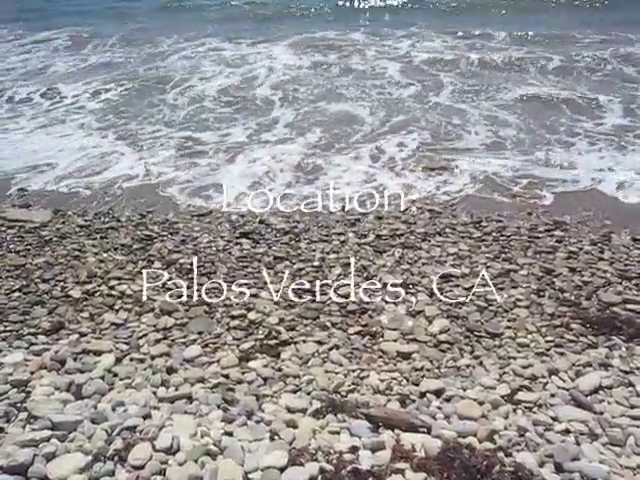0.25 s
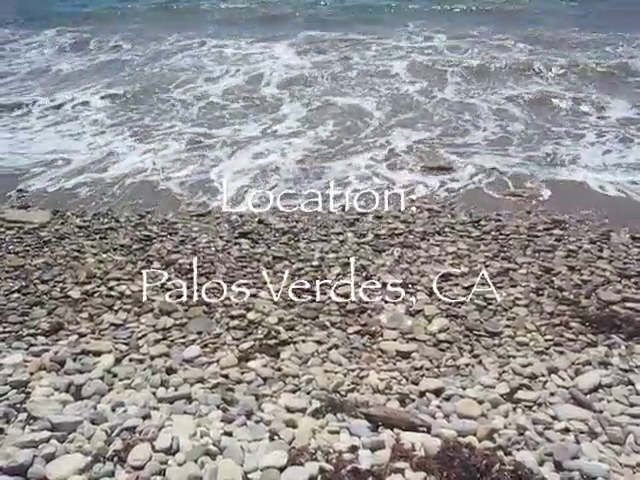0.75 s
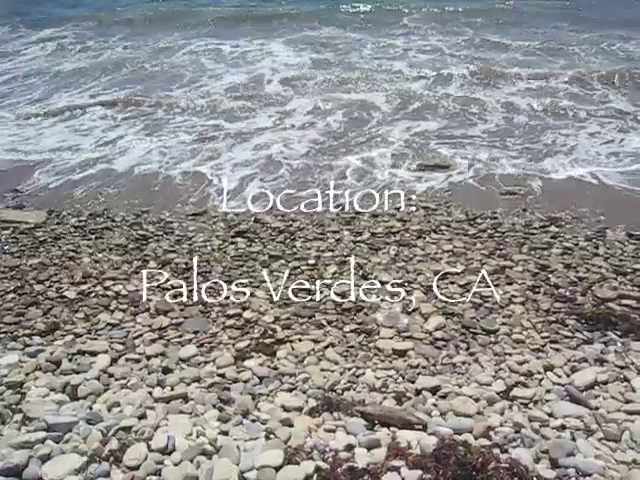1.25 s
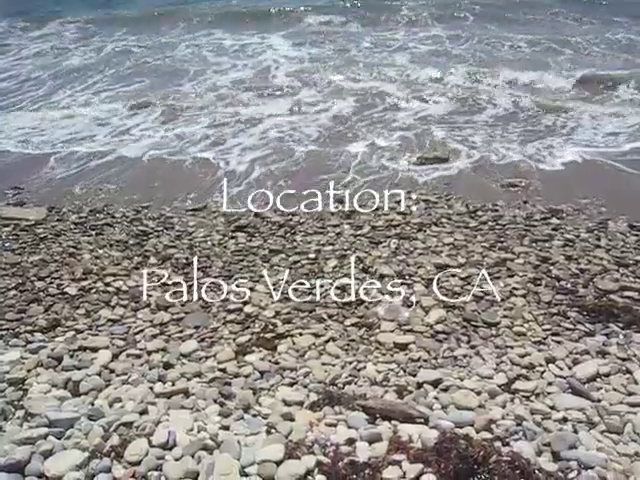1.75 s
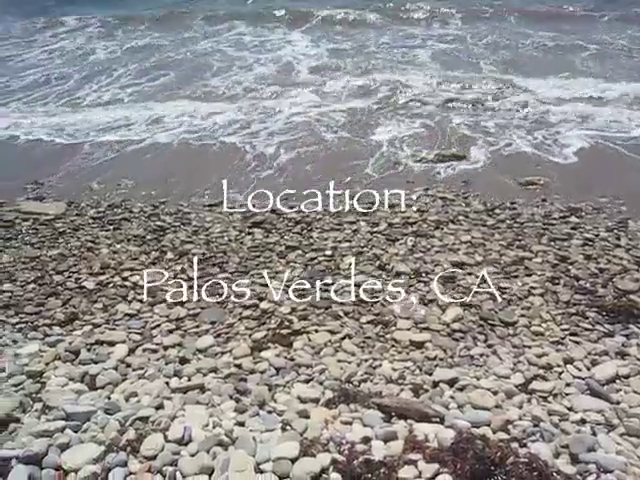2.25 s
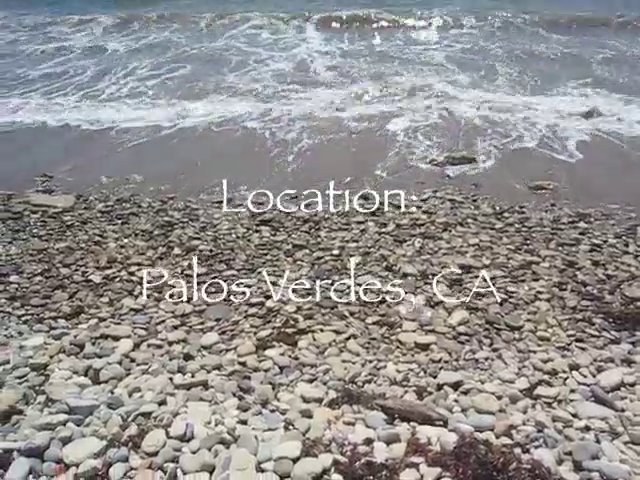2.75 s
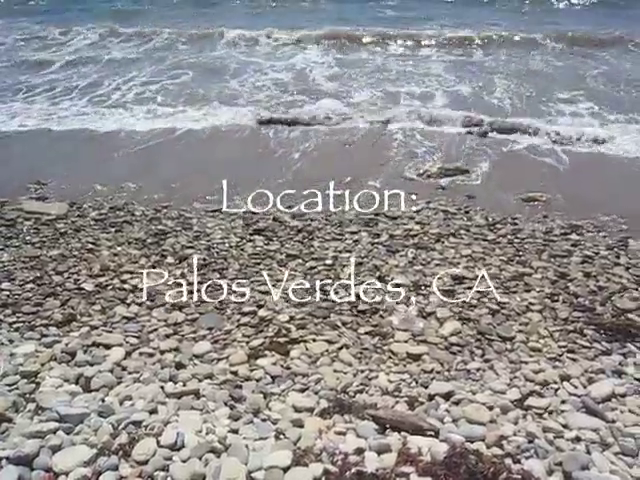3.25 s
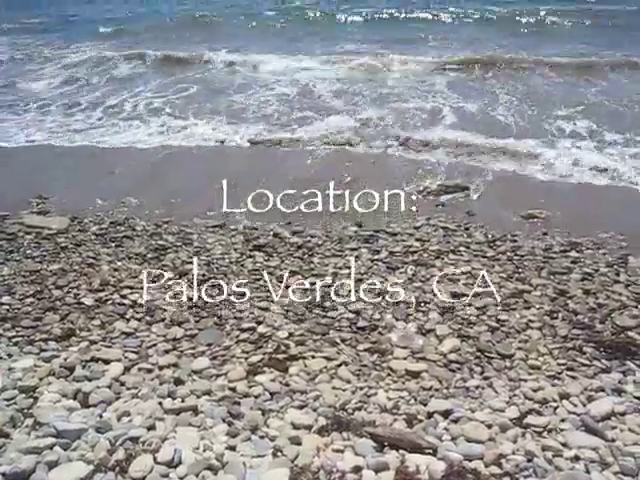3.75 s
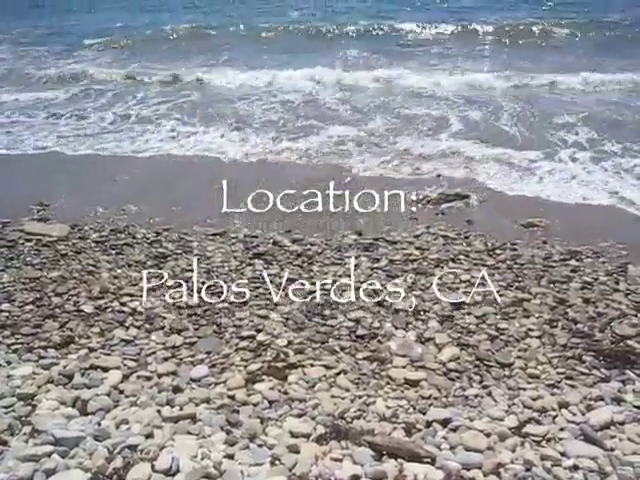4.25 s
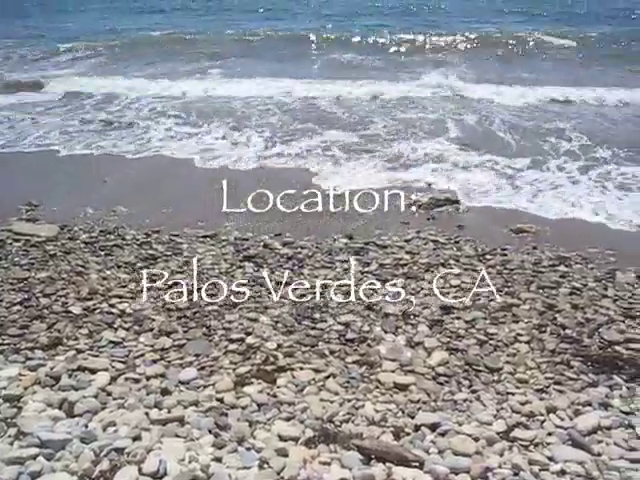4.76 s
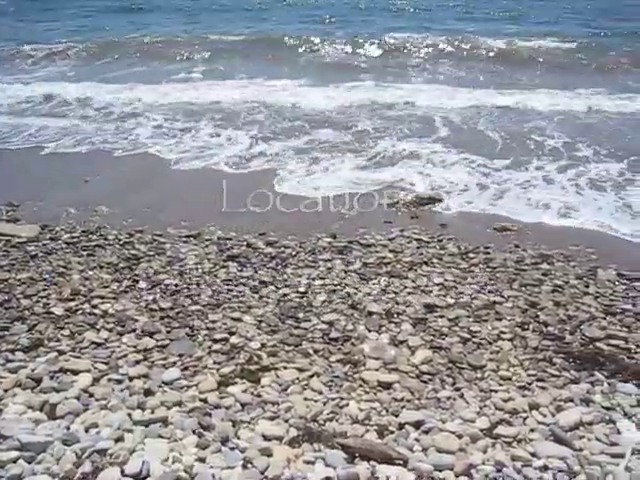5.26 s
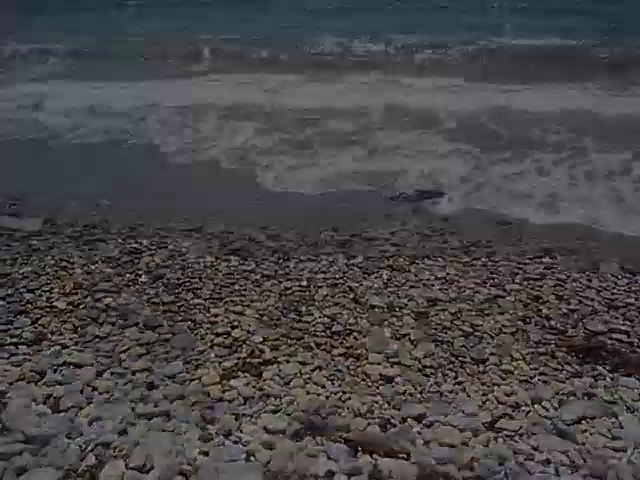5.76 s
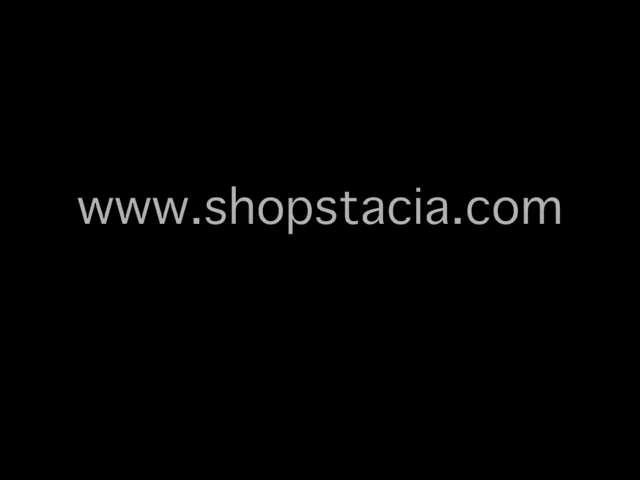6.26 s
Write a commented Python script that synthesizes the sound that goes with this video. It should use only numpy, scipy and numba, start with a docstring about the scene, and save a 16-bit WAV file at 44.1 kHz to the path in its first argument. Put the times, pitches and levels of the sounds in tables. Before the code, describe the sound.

Pebbles knock and rattle beside a dull sea before a wave rushes in, bubbling and fizzing, with low wind thumps and an abrupt fade.

```python
"""Stones knock close to the microphone, over the hiss of backwash on a pebble beach and a far, dull sea.
Then a wave breaks and foams in: large and small bubbles ring, drops splash and foam fizzes over noise.
The surf arrives directly and again off the beach; wind buffets the microphone, in gusts over a breeze.
Stones ring in decaying modes with a rasp of grit. Gain control ducks just after peaks such as the
hardest knock; the treble is cut off at the top, and the sound fades and is cut at the end."""
import sys
import numpy as np
from scipy import signal
from scipy.fft import rfft, irfft, next_fast_len
from scipy.io import wavfile
from scipy.ndimage import map_coordinates
from numba import njit

SR = 44100
rng = np.random.default_rng(int(sys.argv[2]) if len(sys.argv) > 2 else 0)


def file_out(sig):
    """Save sig as 16-bit WAV at sys.argv[1]."""
    # one column per channel
    cols = np.atleast_2d(sig).T
    # limit, then scale
    lim = np.clip(cols, -1, 1)
    pcm = np.round(lim * 32767).astype(np.int16)
    wavfile.write(sys.argv[1], SR, pcm)


N = 286205
TIME = np.arange(N) / SR
FADE_START_S, FADE_END_S = 5.61, 5.954
STOP_S = 5.893  # silence from here, just before the fade would reach zero


def undb(db):
    """Decibels to gain."""
    return 10 ** (np.asarray(db) / 20)


def unit(x):
    """Scale to rms 1."""
    return x / np.sqrt(np.mean(x ** 2))


def curve(table):
    """The second column of a table, joined by straight lines in time."""
    s, values = np.transpose(table)
    return np.interp(TIME, s, values)


def colour(x, spectrum):
    """Filter by (f/Hz, level/dB) points, joined by straight lines over log frequency; rms 1."""
    size = next_fast_len(N)
    hz, db = np.transpose(spectrum)
    bins = np.maximum(np.arange(size // 2 + 1) * SR / size, 1)
    gain = undb(np.interp(np.log(bins), np.log(hz), db))
    return unit(irfft(rfft(x, size) * gain, size)[:N])


def walk(rate):
    """Slow chance: random levels, `rate` per second, smoothly joined; spread near 1."""
    levels = rng.standard_normal(4096)
    return map_coordinates(levels, [TIME * rate], order=3, mode="wrap")


def swell(start_s, rise_s):
    """A smooth rise from 0 to 1."""
    return .5 - .5 * np.cos(np.pi * np.clip((TIME - start_s) / rise_s, 0, 1))


def add(out, s, sound):
    """Mix a sound in at time s."""
    i = max(int(s * SR), 0)
    out[i:i + len(sound)] += sound[:N - i]


# modes of a struck stone: f [multiple of its ring frequency], level/dB
STONE_MODES = [(.41, 1), (.64, -4), (1, 0), (1.13, -7), (1.66, -3)]


def knock(hz, t60, rattle_s, bounce=0.84, scrape_db=-4.0, count=4):
    """One stone strikes another, chatters and scrapes against it; every contact rings the same modes."""
    t = TIME[:SR // 16]
    contacts = rattle_s * (np.arange(count) + rng.uniform(-0.26, 0.28, count)) / count
    contacts[0] = 0
    age = np.maximum(t - contacts[:, None], 0)
    modes = sum(undb(db) * np.sin(2 * np.pi * hz * ratio * age) for ratio, db in STONE_MODES)
    ring = modes * np.exp(-np.log(1000) * age / t60)
    force = np.where(contacts > 0, bounce, 1)
    # grit between the stones rasps for about as long as they rattle
    grit = rng.standard_normal(len(t)) * np.exp(-(t / rattle_s) ** 2)
    # a stone radiates little below its lowest mode or above its highest
    body = signal.butter(3, [.33 * hz, 1.75 * hz], "band", fs=SR, output="sos")
    struck = unit(signal.sosfilt(body, force @ ring))
    scrape = undb(scrape_db) * unit(signal.sosfilt(body, grit))
    sound = struck + scrape
    return sound * np.sqrt(.006 * SR / np.sum(sound ** 2))  # the energy of 6 ms at rms 1


# stones knocked together by the water near the microphone:
# t/s, level over 6 ms/dB, ring f/Hz, ring time to -60 dB t60/s, rattle length/s
STONE_KNOCKS = [ (0.013, -23.5, 1870, .010, 0.0034), (0.054, -25, 1780, 0.011, 0.0058),
                (0.132, -22, 1400, 0.011, .008), (0.1825, -15.5, 1980, 0.0053, 0.0082),
                (0.449, -22, 1810, 0.025, 0.0028), (0.616, -20, 800, 0.017, 0.0047),
                (0.662, -21, 1650, 0.021, 0.0048), (0.821, -20, 2100, .012, 0.00402),
                (1.2746, -18.5, 2700, 0.0052, 0.00242), (1.3702, -15.5, 830, 0.0099, 0.0026),
                (1.424, -21, 1950, 0.011, 0.00353), (2.883, -18.5, 2600, 0.0066, 0.0038),
                (2.8945, -17.5, 1900, 0.0088, 0.0026), (2.911, -10.5, 2800, 0.0093, 0.0035),
                (3.039, -22, 2470, .008, 0.0034), (4.129, -18, 2000, 0.012, 0.0093)]


def stones(faintest_db=-45, range_db=6, low_hz=1100, octaves=0.91, count=45):
    """A few hard knocks, and pebbles rolling faintly under the water all the while."""
    out = np.zeros(N)
    for s, db, hz, t60, rattle_s in STONE_KNOCKS:
        add(out, s, undb(db) * knock(hz, t60, rattle_s))
    for when, loud, pitch in rng.random((count, 3)):
        pebble = knock(low_hz * 2 ** (octaves * pitch), t60=0.016, rattle_s=0.0075)
        add(out, when * STOP_S, undb(faintest_db + range_db * loud) * pebble)
    return out


# colour of the distant breakers: f/Hz, relative level per Hz/dB
FAR_SEA_COLOUR = [(15, -48.5), (70, -13), (170, 0), (280, 2.5), (400, -0.5), (600, 3.5), (800, -5),
                  (1150, 2), (1500, -7.5), (3000, -29.5), (12000, -43)]


def far_sea(db=-30.5, swell_db=1.5):
    """Distant breakers all along the shore blend into a dull roar of noise, its level wavering slightly."""
    return colour(rng.standard_normal(N), FAR_SEA_COLOUR) * undb(db + swell_db * walk(13))


@njit
def ring_grains(start, hz, cycles, size, glide):
    """Add up decaying sines whose pitch rises by the fraction `glide` as they die away."""
    out = np.zeros(N)
    for k in range(len(start)):
        length = int(cycles[k] * SR / hz[k]) + 2
        turn = 2 * np.pi * hz[k] / SR
        pole = np.exp(1j * turn - 5.75 / length)  # falls 50 dB over the length
        bend = np.exp(1j * turn * glide / length)
        z = size[k] + 0j
        for i in range(start[k], min(start[k] + length, N)):
            out[i] += z.imag
            z *= pole
            pole *= bend
    return out


def bubbles(low_hz, high_hz, cycles, spread_db, glide, count, blur_db):
    """A cloud of ringing bubbles, many faint and a few loud, over the noise blur of countless more."""
    when, pitch, damping, loud, sign = rng.random((count, 5)).T
    hz = low_hz * (high_hz / low_hz) ** pitch
    # small bubbles die sooner, so they start stronger: even energy per Hz
    size = undb(-spread_db * np.log(loud + 1 / 300)) * hz * np.sign(sign - .5)
    start = (when * N).astype(np.int64)
    cloud = unit(ring_grains(start, hz, cycles * (.5 + damping), size, float(glide)))
    return cloud + undb(blur_db) * rng.standard_normal(N)


# churning level: quiet in the backwash, swelling as the wave breaks, held while it runs in
BACKWASH_DB, WAVE_DB = -32, -23
BREAK_S, BREAK_RISE_S = 0.68, 0.97
# splash and fizz relative to the churning; finely broken water makes more of both (dB per dB)
SPLASH_DB, SPLASH_PER_FINENESS = -0.35, 0.15
FIZZ_DB, FIZZ_PER_FINENESS = -8, 0.5
SPRAY_LAG_S = 0.12  # splash and fizz swell a little after the churning
BACKWASH_FIZZ_DB = 2  # extra fizz of the foam left by the last wave
# how finely the water is broken up: t/s, small over large bubbles, level/dB
WATER_FINENESS = [(0, 0.56), (1.3, 0.8), (2.2, -1.3), (3.0, 1.53), (3.85, 3), (5.05, -0.73), (5.6, 0.2)]
# colours of the four surf layers, each: f/Hz, relative level per Hz/dB
LARGE_COLOUR = [(20, -62.5), (70, -28.5), (130, -11.5), (180, -1.5), (250, -12), (330, -10), (450, -6),
                (630, 1), (800, 1), (1100, -10), (3000, -39)]
SMALL_COLOUR = [(300, -46), (700, -3), (900, -3.5), (1120, 1.5), (1400, -3.5), (1800, -15), (2600, -11.5),
                (6000, -45.5)]
SPLASH_COLOUR = [(600, -28.5), (1300, 1), (2000, 0.5), (2700, -1), (3600, -5), (5000, -10), (6500, -18),
                 (15000, -49)]
FIZZ_COLOUR = [(1500, -14.5), (3200, 0), (4800, 4), (6500, 3), (7800, -0.5), (10000, -1.5), (11700, -1),
               (13500, -5.5), (15700, -9)]


def surf():
    """Large and small bubbles churn, drops splash and foam fizzes as the wave breaks and runs in."""
    broken = swell(BREAK_S, BREAK_RISE_S)
    late_broken = swell(BREAK_S + SPRAY_LAG_S, BREAK_RISE_S)
    churn_db = BACKWASH_DB + (WAVE_DB - BACKWASH_DB) * broken
    spray_db = (WAVE_DB - BACKWASH_DB) * (late_broken - broken)
    fineness_db = curve(WATER_FINENESS)
    splash_db = SPLASH_DB + SPLASH_PER_FINENESS * fineness_db + spray_db
    left_foam_db = BACKWASH_FIZZ_DB * (1 - broken)
    fizz_db = FIZZ_DB + FIZZ_PER_FINENESS * fineness_db + left_foam_db + spray_db
    surge_db = 0.22 * walk(4.2) + 0.5 * walk(50)  # the front tumbles unevenly, in all sizes at once

    large = bubbles(165.6, 1240, cycles=10.5, spread_db=0.5, glide=0.11, count=7000, blur_db=3.5)
    small = bubbles(599, 2375, cycles=14.3, spread_db=1.5, glide=0.18, count=7000, blur_db=6.5)
    splash = bubbles(890, 8000, cycles=7, spread_db=2.0, glide=0.15, count=26000, blur_db=6.5)
    fizz = bubbles(3500, 16000, cycles=2.9, spread_db=2.5, glide=.1, count=50000, blur_db=3.5)

    # the churning shifts between the two sizes at constant power
    small_share = 1 / (1 + undb(-2.2 * fineness_db + 2.0))
    # the finer the water is broken up, the higher the small bubbles ring
    pitch = 2 ** (.06 * (fineness_db - 2.5))
    small = colour(small, SMALL_COLOUR)
    small = np.interp(np.cumsum(pitch), np.arange(N), small, period=N)
    small = small * np.sqrt(small_share) * undb(.5 + 0.31 * walk(32))
    large = colour(large, LARGE_COLOUR) * np.sqrt(1 - small_share) * undb(0.35 + 0.91 * walk(35))
    splash = colour(splash, SPLASH_COLOUR) * undb(splash_db + 0.64 * walk(30))
    fizz = colour(fizz, FIZZ_COLOUR) * undb(fizz_db + .25 * walk(39))
    return (large + small + splash + fizz) * undb(churn_db + surge_db)


ECHO_START, ECHO_FULL, ECHO_FULL_S = 0.049, 0.22, 2.3  # strengths 0-1, and when it is full
# how much later the surf reaches the microphone off the beach: t/s, lag/ms
BEACH_ECHO_LAG = [(1.4, 2.02), (2.3, 1.98), (3.2, 1.79), (4.2, 1.99), (5.2, 1.91)]


def off_the_beach(x, dull_hz=3800):
    """The surf arrives twice, which hollows its sound; rough stones scatter the treble of the echo."""
    lag_ms = curve(BEACH_ECHO_LAG)
    strength = np.interp(TIME, [0, ECHO_FULL_S], [ECHO_START, ECHO_FULL])
    smooth = signal.sosfiltfilt(signal.butter(1, dull_hz, fs=SR, output="sos"), x)
    echo = np.interp(TIME - lag_ms / 1000, TIME, smooth)
    return (x + strength * echo) / np.sqrt(1 + strength ** 2)


BREEZE_DB, FLURRY_DB, FLURRIES_PER_S = -43, 2, 26
# gusts on the microphone: peak t/s, buffeting level/dB, length/s
WIND_GUSTS = [(0.56, -37, 0.16), (0.82, -32, 0.16), (1.57, -32, 0.26), (2.101, -26, 0.23),
              (2.431, -26.5, 0.26), (2.68, -24, 0.16), (2.98, -33, 0.12), (4.05, -45.5, 0.3),
              (4.93, -37, 0.25), (5.49, -30.5, 0.12)]
# colour of the buffeting: f/Hz, relative level per Hz/dB
BUFFET_COLOUR = [(8, -64.5), (22, -30.5), (35, -13), (55, -8.5), (110, -1.5), (170, -5.5), (260, -6.5),
                 (400, -16.5), (900, -49)]


def wind():
    """Eddies thump on the microphone in flurries; gusts swell, die and add their power to the breeze."""
    power = undb(BREEZE_DB) ** 2
    for s, db, length_s in WIND_GUSTS:
        power = power + undb(db) ** 2 * np.exp(-(2 * (TIME - s) / length_s) ** 2)
    buffeting = colour(rng.standard_normal(N), BUFFET_COLOUR)
    return buffeting * np.sqrt(power) * undb(FLURRY_DB * walk(FLURRIES_PER_S))


def scene():
    """Everything at one microphone, the same in both ears."""
    sound = stones() + far_sea() + off_the_beach(surf()) + wind()
    return np.array([sound, sound])


@njit
def follow(x, attack_s, release_s):
    """Level detector that rises fast and falls slowly."""
    out, e = np.empty(len(x)), 0.
    for i in range(len(x)):
        e += (x[i] - e) / (SR * (attack_s if x[i] > e else release_s))
        out[i] = e
    return out


TOP_HZ = 15800  # little treble passes above this


def record(dry, threshold_db=-10, attack_s=0.0003, release_s=0.11, ceiling=1.0):
    """Gain control ducks just after loud peaks, the hardest are rounded off; the end is faded and cut."""
    level = follow(np.abs(dry[0]), attack_s, release_s)
    late = np.interp(TIME - .0016, TIME, level)  # the gain reacts 1.6 ms late
    held = dry / np.maximum(late / undb(threshold_db), 1)
    rounded = held / (1 + (held / ceiling) ** 4) ** (1 / 4)
    fade = np.interp(TIME, [FADE_START_S, FADE_END_S], [1, 0]) * (TIME < STOP_S)
    return signal.sosfilt(signal.ellip(12, .1, 80, TOP_HZ, fs=SR, output="sos"), rounded * fade)


dry = scene()
out = record(dry)
file_out(out)
```